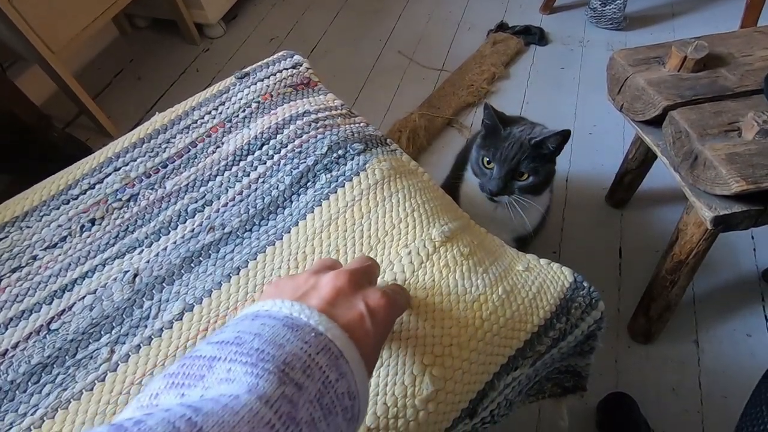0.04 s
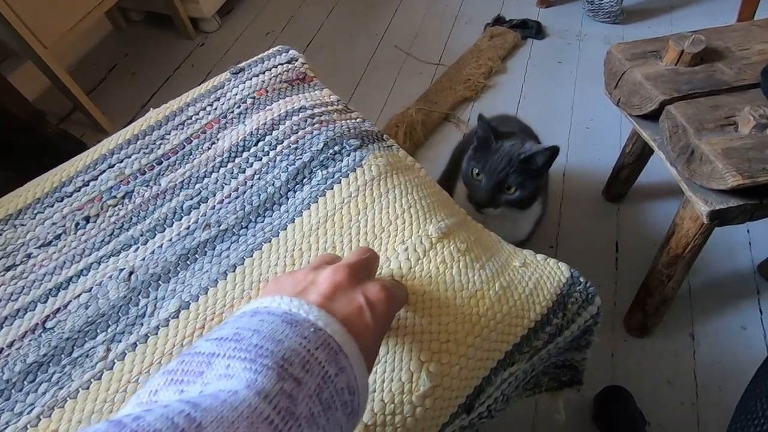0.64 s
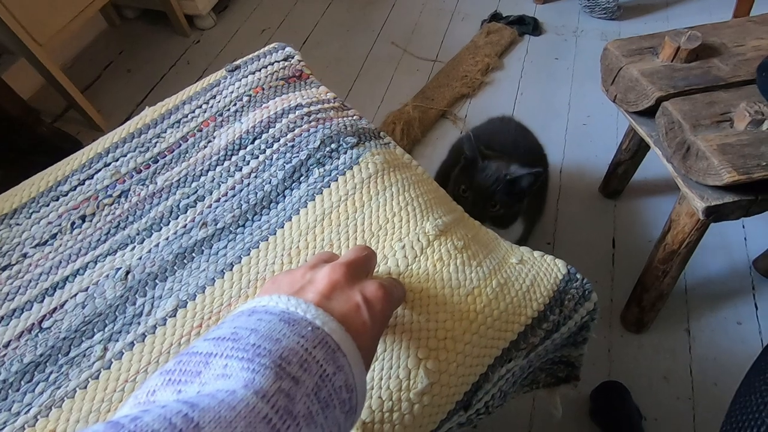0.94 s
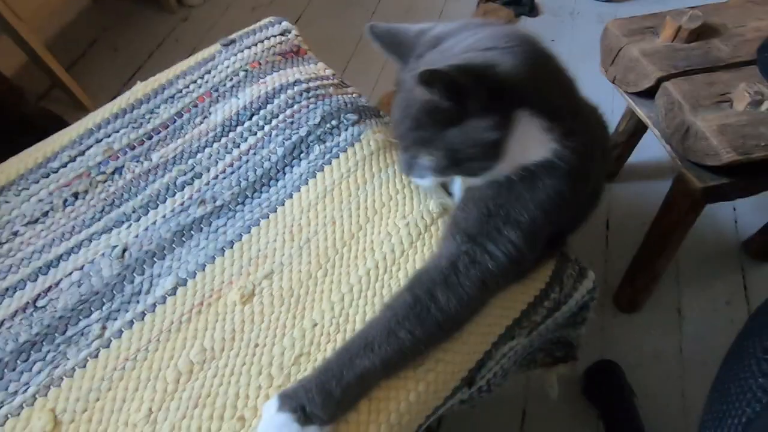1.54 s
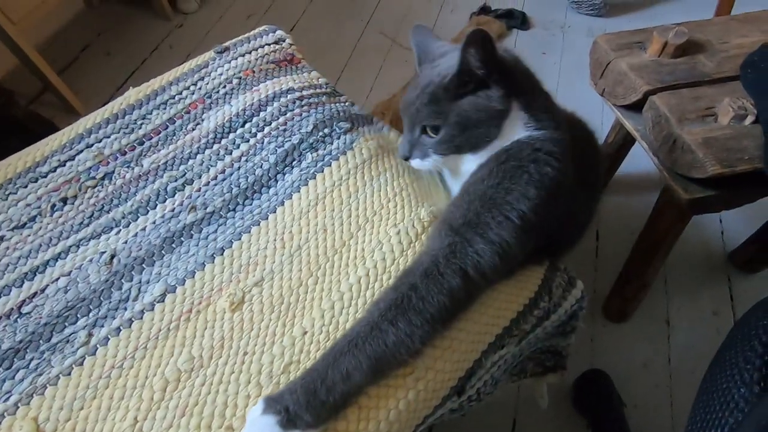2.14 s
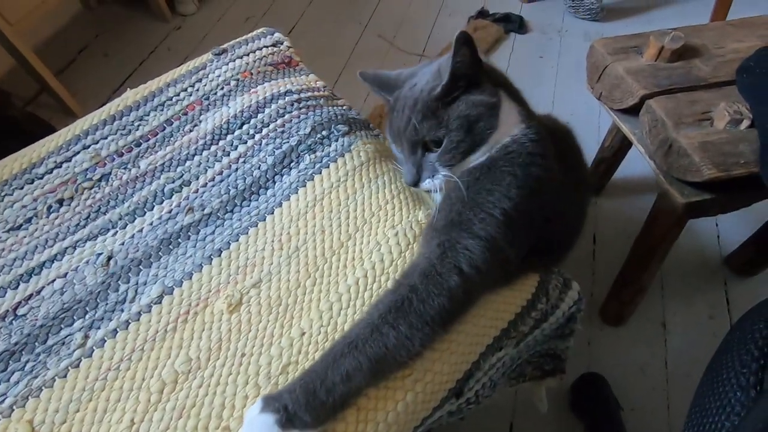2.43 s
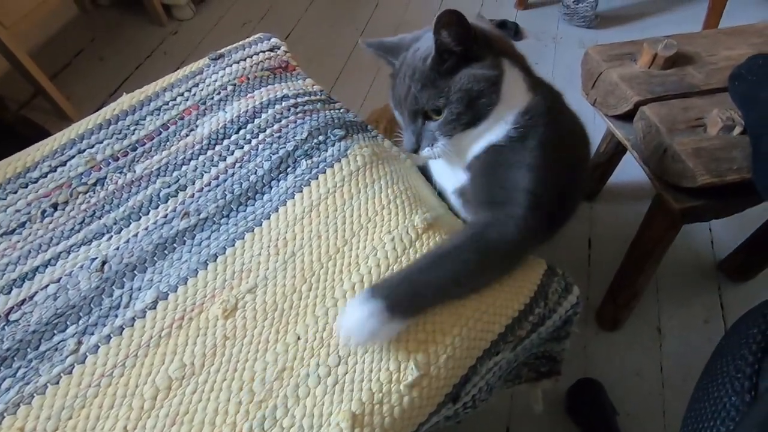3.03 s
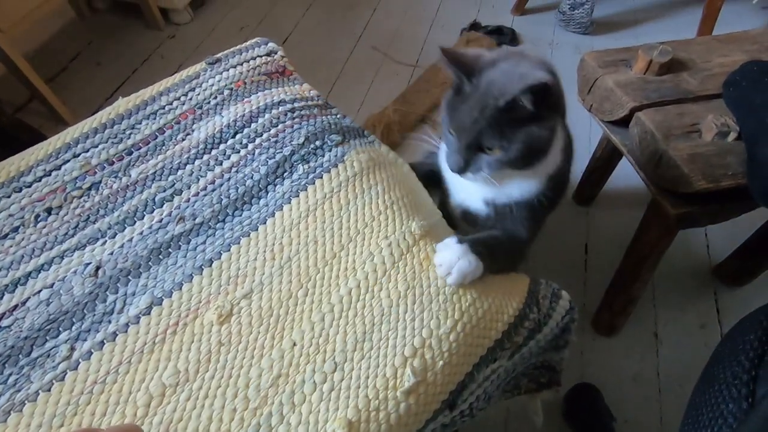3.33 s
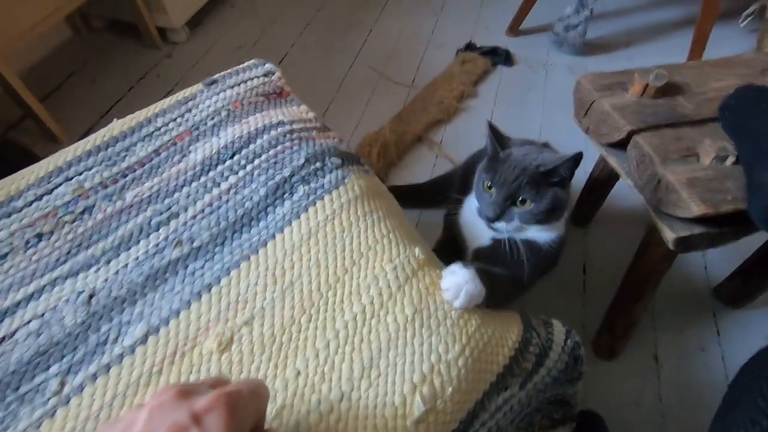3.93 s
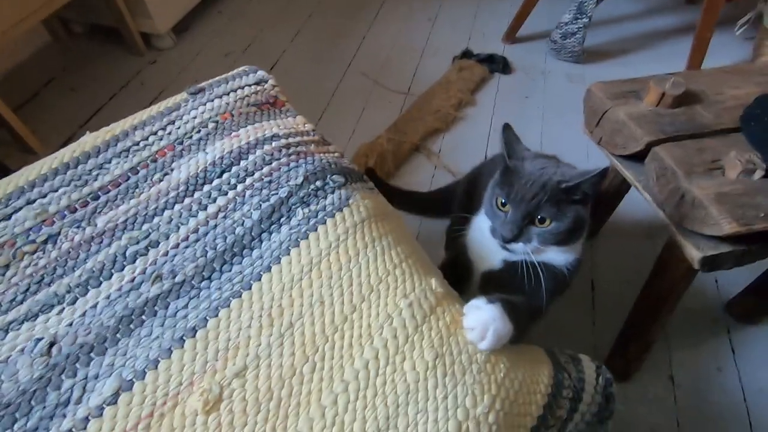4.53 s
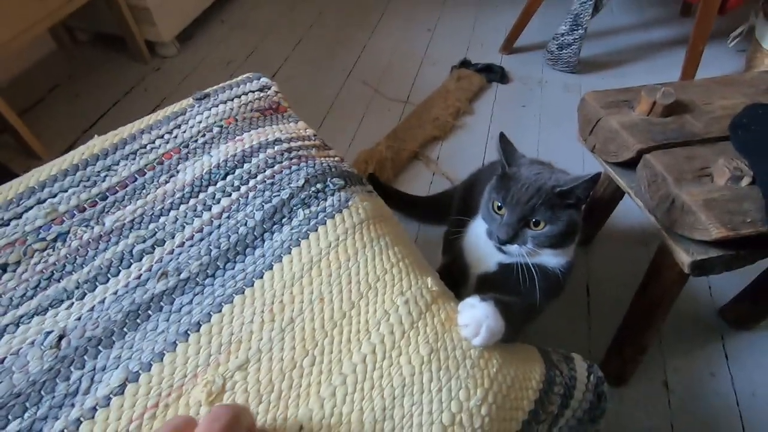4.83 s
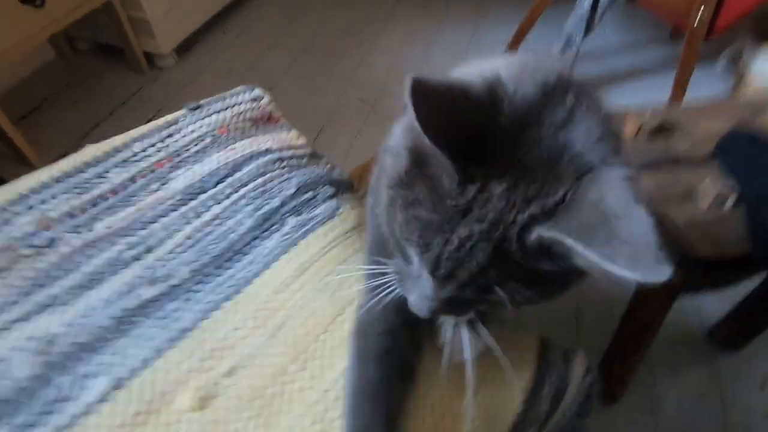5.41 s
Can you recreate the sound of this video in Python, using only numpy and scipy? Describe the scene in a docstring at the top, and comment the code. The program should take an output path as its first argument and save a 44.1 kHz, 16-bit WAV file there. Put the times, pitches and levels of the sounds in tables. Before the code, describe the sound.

A cat's paws thud and scratch on a rug-covered wooden table, with cloth rustling and low microphone bumps in a quiet room.

```python
"""A cat's paws and a teasing hand thud on a woven rug laid over a wooden table, ringing the padded wood.
Claws rake the weave and pluck its threads, the rug drags on the wood, and fur and a sleeve rustle.
Heard from close by on the stereo microphones of a hand-held camera, which is bumped, rubbed and
rumbles as the hand darts in and out. Behind it all lies a quiet furnished room with a faint hiss."""
import sys
import numpy as np
from scipy import signal
from scipy.fft import rfft, irfft
from scipy.io import wavfile
from scipy.ndimage import uniform_filter1d

SR = 44100
rng = np.random.default_rng(int(sys.argv[2]) if len(sys.argv) > 2 else 0)


def bounce(signal):
    """Save signal as a 16-bit WAV file at the path given by the first command-line argument."""
    frames = np.transpose(np.atleast_2d(signal))
    limited = np.clip(frames, -1, 1)
    pcm = np.round(limited * 32767).astype(np.int16)
    wavfile.write(sys.argv[1], SR, pcm)


N = 249826

# landings on the rug, close to the camera: t/s, level/dB, hardness/(dB per octave), ring length factor
LANDINGS = [(0.28, -67.5, 5, 0.25), (1.083, -53, 3.5, 1.55), (1.2155, -31.5, 0, 0.36),
            (1.227, -38.5, 6, 0.93), (1.276, -39, -4.5, 0.69), (1.318, -38.5, -2, 2.26),
            (1.37, -34, -1.5, 0.51), (1.503, -45, 1, 0.43), (1.649, -55.5, -7, 0.97), (2.512, -49, -3, 2.4),
            (2.597, -41, -5.5, 0.56), (2.745, -43, 2.5, 0.59), (2.794, -46.5, 1.5, 0.33),
            (3.01, -62, 8, 0.76), (3.444, -37.5, 3, 0.66), (3.459, -37, 1.5, 0.57), (3.469, -36, 3.5, 0.51),
            (5.244, -47.5, 1.5, 1.74), (5.354, -50.5, 8, 0.32)]
# main modes of the table under the rug: f/Hz, relative level/dB, t60/s
TABLE_MODES = [(108, -7.5, 0.088), (158.2, 8.5, 0.22), (207.7, 7.5, 0.24), (312, -3, 0.21),
               (543, -14.5, 0.18), (613, -16.5, 0.25), (738, -11, 0.28), (848, -7, 0.094),
               (1177, -13.5, 0.23), (1525, -27, 0.24), (1715, -32, 0.33)]
# spectrum of its dense remaining modes: f/Hz, relative level/dB
WOOD_SPECTRUM = [(60, -25), (130, 1), (300, -5), (470, -15.5), (750, -18.5), (1600, -33.5), (2500, -48.5),
                 (6000, -66), (16000, -100)]
def paw_thuds():
    """Each paw or finger rings the table through the rug; harder blows reach its higher modes."""
    out, t = np.zeros((2, N)), np.arange(SR // 3) / SR
    for s, db, hardness, ring in LANDINGS:
        modes = 0
        for k, (hz, level, t60) in enumerate(TABLE_MODES):
            lag_s = rng.uniform(-0.00019, 0.00065, (2, 1))  # each microphone hears it at its own time
            decay = amp(level + hardness * np.log2(hz / 200) - 60 * t / (t60 * ring))
            modes += (-1) ** k * decay * np.sin(2 * np.pi * hz * (t + lag_s))
        tilted = [(hz, level + hardness * np.log2(hz / 200)) for hz, level in WOOD_SPECTRUM]
        dense = colour(mic_noise(len(t), alike=0.96), tilted) * amp(-60 * t / (0.26 * ring))
        blow = (unit(modes) + amp(-2.5) * unit(dense)) * (1 - np.exp(-t / 0.00037))
        add(out, s, amp(db) * unit_onset(blow, samples=880))
    return out


# thread snaps and nail taps on the rug: t/s, level/dB, low edge/Hz, high edge/Hz, left minus right/dB
SNAPS = [(1.0584, -54, 151, 2450, 5.5), (1.2898, -52.5, 7000, 10600, 2), (1.295, -51.5, 7000, 11000, 7),
         (1.305, -50, 3330, 10900, -12), (1.504, -48, 202, 3000, -4), (1.845, -59, 188, 1240, 4.5),
         (2.5018, -47, 1198, 2430, -10), (2.515, -45.5, 1360, 3140, -2), (2.5342, -46, 1410, 3800, -7),
         (2.5916, -38, 380, 8000, 1), (2.597, -37, 400, 6000, 0), (2.7516, -55, 3180, 4660, -2),
         (2.766, -56.5, 900, 9800, 3), (2.7944, -47, 480, 6070, 3.5), (3.0128, -51, 590, 2200, 1.5),
         (3.3386, -50.5, 328, 5500, -1.5), (3.4433, -49, 380, 7100, -1), (3.4677, -53, 700, 6050, -1),
         (3.991, -54, 4000, 9940, -11), (5.349, -59, 8050, 11000, -3.5), (5.3561, -44.5, 700, 2350, 1)]
def claw_snaps():
    """A thread slips off a claw: one snap and a brief spray of fibre noise."""
    out, t = np.zeros((2, N)), np.arange(SR // 50) / SR
    for s, db, low_hz, high_hz, pan_db in SNAPS:
        snap = 0.16 * mic_noise(len(t), alike=0.3) * np.exp(-t / 0.0012)
        snap[[0, 1], [0, 2]] += 1  # the click reaches the left microphone a moment earlier
        snap = unit_onset(band(snap, low_hz, high_hz, order=4), samples=350)
        add(out, s, amp(db) * pan(pan_db) * snap)
    return out


# the weave under the claws, a little to the right: f/Hz, relative level/dB
WEAVE_SPECTRUM = [(200, -1.5), (500, -7), (950, -11), (1450, 2.5), (2100, 1), (2800, -7.5), (3300, -2.5),
                  (4600, -8.5), (7000, -28.5), (9700, -25), (15000, -47)]
def claw_rake(start_s=2.499, hold_s=0.076, bite_s=0.0049, t60_s=0.31, build_db_per_s=19, skips_per_s=240):
    """Claws bite, tear across the weave, skipping from thread to thread, and let go."""
    t = np.maximum(np.arange(N) / SR - start_s, 0)
    bite = 1 - np.exp(-t / bite_s)
    pull = bite * amp(build_db_per_s * t - 60 * np.maximum(t - hold_s, 0) / t60_s)
    skips = np.cumsum(rng.exponential(SR / skips_per_s, N // 40))
    catches = np.bincount(skips[skips < N].astype(int), minlength=N)
    grit = 1 + 1.6 * signal.lfilter([1], [1, -np.exp(-1 / (0.0008 * SR))], catches)
    return amp(-47.5) * colour(mic_noise(N, alike=0.75) * grit, WEAVE_SPECTRUM) * pull * pan(-3)


# short brushes over the weave, close up: t/s, level/dB, t60/s, low edge/Hz, high edge/Hz
BRUSHES = [(1.215, -34, 0.16, 1090, 1590), (1.365, -47.5, 0.098, 1500, 3520),
           (1.678, -63, 0.2, 3530, 11800), (1.769, -54, 0.13, 920, 2800), (1.894, -57, 0.22, 1000, 2900),
           (2.349, -70.5, 0.41, 2980, 8800), (2.756, -60, 0.16, 944, 5450), (3.455, -62, 0.57, 1000, 5100),
           (5.241, -48.5, 0.13, 835, 3980), (5.466, -47, 0.21, 400, 3130)]
def paw_scuffs(rise_cycles=4.1):
    """A paw or finger brushes the rug and comes to rest."""
    out, t = np.zeros((2, N)), np.arange(SR // 2) / SR
    for s, db, t60, low_hz, high_hz in BRUSHES:
        rise_s = rise_cycles / low_hz  # duller strokes start more softly
        stroke = np.minimum(t / rise_s, 1) * amp(-60 * np.maximum(t - rise_s, 0) / t60)
        friction = band(fibres(len(t), grain_db=2.5, alike=0.39), low_hz, high_hz)
        add(out, s, amp(db) * stroke * unit(friction))
    return out


# the rug shifting on the tabletop, centred: t/s, hold/s, level/dB, resonance f/Hz
DRAGS = [(1.634, 0.016, -56, 284), (1.734, 0.067, -59, 281), (1.91, 0.098, -58.5, 282),
         (1.967, 0.0059, -63.5, 613), (2.254, 0.14, -64, 206), (2.324, 0.016, -50, 202),
         (2.705, 0.026, -59.5, 225), (2.751, 0.013, -46, 202.3), (3.016, 0.021, -53.5, 172),
         (3.228, 0.023, -60, 232)]
def rug_drags(relative_width=0.3):
    """The leaning cat drags the rug over the wood, which answers with a hollow, narrow-band murmur."""
    out = np.zeros((2, N))
    for s, hold_s, db, hz in DRAGS:
        edges_hz = [hz * (1 - relative_width / 2), hz * (1 + relative_width / 2)]
        wood = signal.butter(2, edges_hz, "band", fs=SR, output="sos")
        murmur = unit(signal.sosfilt(wood, mic_noise(N, alike=0.98)))
        out += amp(db) * swell(s, hold_s, rise_s=0.08, t60_s=0.12) * murmur
    return out


# movements near the camera: full speed t/s, hold/s, rise/s, t60/s, relative body/dB, relative sheen/dB
MOVEMENTS = [(1.333, 0.053, 0.33, 0.28, -41, -59), (1.45, 0.055, 0.77, 0.26, -54, -66.5),
             (1.63, 0.022, .3, 4.4, -65.5, -86), (2.908, 0.61, .4, 1.2, -71, -84.5),
             (3.728, 0.6, 0.57, 0.93, -64.5, -77), (5.24, 0.05, 0.14, 0.18, -54, -64.5),
             (5.429, 0.082, 0.49, 0.22, -50.5, -64.5), (5.574, 0.088, 0.33, 0.45, -61.5, -74)]
# soft body of the rustle: f/Hz, relative level/dB
BODY_SPECTRUM = [(150, -2.5), (400, 9), (900, 3.5), (1800, 3.5), (3000, -1), (5000, -9), (7000, -14),
                 (14000, -29.5)]
# fine hiss of its fibres: f/Hz, relative level/dB
SHEEN_SPECTRUM = [(2500, -4), (5200, 10.5), (7000, 1), (9500, 3), (12000, -13), (15500, -38)]
def cloth_rustle():
    """Fur, sleeve and rug slide: a soft body and a fine hiss, wavering with the pressure."""
    moves = [(swell(*shape), body_db, sheen_db) for *shape, body_db, sheen_db in MOVEMENTS]
    body_gain = np.max([amp(db) * move for move, db, _ in moves], axis=0)
    sheen_gain = np.max([amp(db) * move for move, _, db in moves], axis=0)
    body = colour(fibres(N, grain_db=-1.0, alike=0.016), BODY_SPECTRUM) * body_gain
    sheen = colour(fibres(N, grain_db=2.0, alike=0.088), SHEEN_SPECTRUM) * sheen_gain
    pressure = waver(N, depth_db=2.15, samples=1300)
    return (amp(-5.0) * body + amp(0.5) * sheen) * pressure * pan(0.1)


# bumps on the camera body: t/s, thump level/dB, thump f/Hz, sway level/dB, left minus right/dB
BUMPS = [(1.309, -19.5, 84, -29, -12.5), (1.365, -34, 98, -21.5, -4), (1.376, -17, 112.4, -36, -15.5),
         (1.436, -19, 139, -29.5, 8), (3.989, -30.5, 128, -25.5, -9), (4.174, -9, 191.8, -21, -4.5),
         (4.205, -44.5, 140, -22.5, 3), (5.433, -33.5, 108, -27, -12)]
# modes of its case: f/Hz, relative level/dB, t60/s, phase between the microphones/rad
CASE_MODES = [(296.5, -14.5, 0.044, 0.86), (645, -15, 0.011, 1.3), (1223, -21, 0.015, 4.55),
              (4190, -38.5, 0.011, .2)]
# its loose parts: f/Hz, relative level/dB
CLATTER_SPECTRUM = [(150, -8), (450, 6), (1400, -6), (1900, -31), (5000, -26.5), (15000, -59)]
def camera_jolts(full_ring_db=-9, ring_db_per_db=2.27, clatter_t60_s=0.054):
    """Each jolt thumps the camera and sways it in the hand; only a hard one rings its case."""
    out, t = np.zeros((2, N)), np.arange(-SR // 8, SR // 4) / SR
    age = np.maximum(t, 0)
    modes = sum(amp(db - 60 * age / t60) * mic_sine(hz * age, spread_rad)
                for hz, db, t60, spread_rad in CASE_MODES)
    rattle = colour(mic_noise(len(t), alike=0.61), CLATTER_SPECTRUM)
    clatter = amp(-33 - 60 * age / clatter_t60_s) * rattle
    ring = (modes + clatter) * (1 - np.exp(-age / 0.0017))
    for s, db, hz, sway_db, pan_db in BUMPS:
        thump = amp(db) * swing(t, hz, cycles=0.51, spread_rad=0.29)
        sway = amp(sway_db) * swing(t, hz=37.6, cycles=0.57, spread_rad=0.69)
        ring_gain = amp(ring_db_per_db * (db - full_ring_db))
        add(out, s + t[0], pan(pan_db) * (thump + sway + ring_gain * ring))
    return out


# finger strokes on the camera case: t/s, hold/s, level/dB
FINGER_STROKES = [(1.305, 0.056, -44.5), (1.374, 0.0056, -33.5), (3.991, 0.00081, -53),
                  (4.172, 0.0046, -46.5)]
def finger_rubs():
    """A finger drags over the camera case beside the right microphone."""
    press = sum(amp(db) * swell(s, hold_s, rise_s=0.04, t60_s=0.049) for s, hold_s, db in FINGER_STROKES)
    skin = band(fibres(N, grain_db=3.0, alike=0.19), low_hz=248, high_hz=1047, order=3)
    return unit(skin) * press * pan(-8)


# shifts of the hand holding the camera: t/s, level/dB, t60/s
GRIP_SHIFTS = [(0.717, -43.5, 0.21), (1.351, -20.5, 0.62), (1.87, -43, 0.31), (2.38, -51, 1),
               (4.05, -34.5, 0.73), (4.251, -34.5, 1), (5.479, -28.5, 0.55)]
# rumble carried through the body to the microphones: f/Hz, relative level/dB
RUMBLE_SPECTRUM = [(12, -1.5), (25, 6), (50, -1.5), (80, -23.5), (130, -23), (250, -34), (1500, -101.5)]
def grip_rumble(tremor_db=-62.5):
    """The camera rumbles in the grip: a steady tremor, and a swell with each shift."""
    motion = amp(tremor_db) * np.ones(N)
    for s, db, t60 in GRIP_SHIFTS:
        motion = np.hypot(motion, amp(db) * swell(s, hold_s=0, rise_s=0.63 * t60, t60_s=t60))
    roughness = (motion / motion.max()) ** 0.81  # only rough handling shakes the case
    thudding = amp(-10.0) * roughness * unit(band(mic_noise(N, alike=0.5), low_hz=52, high_hz=170))
    return (colour(mic_noise(N, alike=0.49), RUMBLE_SPECTRUM) + thudding) * motion


# decay of the room around the table: f/Hz, t60/s
ROOM_DECAY = [(100, 0.72), (500, 0.23), (3000, 0.25), (8000, 0.15), (15000, 0.22)]
def room_echo(x):
    """A short furnished-room tail, dying sooner in the treble."""
    hz, t, spectrum = signal.stft(rng.standard_normal((2, SR // 2)), SR, nperseg=256)
    decay = amp(-60 * t / curve(ROOM_DECAY, hz)[:, None])
    _, tail = signal.istft(spectrum * decay, SR, nperseg=256)
    tail *= 1 - np.exp(-np.arange(tail.shape[1]) / SR / 0.0031)
    return signal.fftconvolve(x, tail / np.linalg.norm(tail[0]), axes=1)[:, :N]


# room tone at the camera: f/Hz, relative level/dB
TONE_SPECTRUM = [(60, -22.5), (110, -15), (180, -2), (330, -16.5), (480, -23.5), (800, -11.5), (877, -2),
                 (960, -12), (1350, -13.5), (2000, -22), (2400, -29.5), (6000, -36), (15000, -52)]
# its stereo width: f/Hz, side minus mid/dB
TONE_WIDTH = [(100, -11.5), (400, 6.5), (1300, 3.5), (4000, -1.5)]
# its level, easing and returning: t/s, level/dB
TONE_LEVEL = [(1.1, -65.5), (2.1, -69), (4.502, -67), (5.0, -66), (5.6, -61.5)]
def room_tone():
    """Faint hiss of the house, arriving from all around."""
    mid, side = colour(rng.standard_normal((2, N)), TONE_SPECTRUM)
    side = equalise(side, TONE_WIDTH)
    level_db = np.interp(np.arange(N) / SR, *np.transpose(TONE_LEVEL))
    return amp(level_db) * unit(np.array([mid + side, mid - side])) * pan(1.0)


def amp(db):
    return 10 ** (np.asarray(db) / 20)


def unit(x):
    return x / np.sqrt(np.mean(x ** 2) + 1e-20)


def unit_onset(x, samples):
    """Scales a hit to rms 1 over its first samples."""
    return x / np.sqrt(np.mean(x[:, :samples] ** 2))


def pan(left_minus_right_db):
    return amp([[left_minus_right_db / 2], [-left_minus_right_db / 2]])


def add(mix, s, sound):
    part = mix[:, max(round(s * SR), 0):][:, :sound.shape[-1]]
    part += sound[..., :part.shape[1]]


def curve(points, hz):
    """A table joined by straight lines over log frequency."""
    f, value = np.transpose(points)
    return np.interp(np.log(hz + 1), np.log(f + 1), value)


def equalise(x, points):
    hz = np.fft.rfftfreq(x.shape[-1], 1 / SR)
    return irfft(rfft(x) * amp(curve(points, hz)), x.shape[-1])


def colour(x, points):
    return unit(equalise(x, points))


def band(x, low_hz, high_hz, order=6):
    """Causal band: soft below, steep above, falling gently in between."""
    low_hz, high_hz = np.clip([low_hz, high_hz], 20, SR / 2.2)
    x = signal.sosfilt(signal.butter(2, low_hz, "high", fs=SR, output="sos"), x)
    x = 0.08 * x + signal.sosfilt(signal.butter(1, low_hz, fs=SR, output="sos"), x)
    return signal.sosfilt(signal.butter(order, high_hz, fs=SR, output="sos"), x)


def mic_noise(size, alike):
    """White noise, partly alike at the two microphones."""
    common = rng.standard_normal(size)
    return np.sqrt(alike) * common + np.sqrt(1 - alike) * rng.standard_normal((2, size))


def mic_sine(turns, spread_rad):
    """A vibration, out of step at the two microphones."""
    return np.sin(2 * np.pi * turns + spread_rad * np.array([[0.5], [-0.5]]))


def waver(size, depth_db, samples):
    """A random gain, smoothed over some samples."""
    return amp(depth_db * unit(uniform_filter1d(rng.standard_normal(size), samples)))


def fibres(size, grain_db, alike):
    """Friction noise: threads catch and let go in clumps of about a millisecond."""
    return mic_noise(size, alike) * waver(size, grain_db, samples=60)


def swell(s, hold_s, rise_s, t60_s):
    """Gain of one movement: builds by 60 dB over the rise, holds from s, then dies away."""
    t = np.arange(N) / SR - s
    return amp(-60 * (np.maximum(-t, 0) / rise_s + np.maximum(t - hold_s, 0) / t60_s))


def swing(t, hz, cycles, spread_rad, lag_cycles=0.79):
    """One way, back, and dying out; strongest about lag_cycles after the jolt."""
    turns = hz * t - lag_cycles
    age = np.clip(turns / cycles, -20, 20)
    return 2 * mic_sine(turns, spread_rad) / (np.exp(-3 * age) + np.exp(2 * age))


def scene():
    """The play on the table echoes in the room; handling noise reaches the microphones directly."""
    thuds, snaps = paw_thuds(), claw_snaps()
    friction = paw_scuffs() + rug_drags() + claw_rake() + cloth_rustle()
    echo = room_echo(amp(-22.5) * thuds + amp(-7.5) * snaps + amp(-12.5) * friction)
    handling = grip_rumble() + finger_rubs() + camera_jolts()
    return thuds + snaps + friction + echo + handling + room_tone()


def record(dry):
    """The camera cuts the treble above 15.6 kHz."""
    lowpass = signal.firwin(255, 15600, window=("kaiser", 9), fs=SR)
    return signal.oaconvolve(dry, lowpass[None], "same")


dry = scene()
out = record(dry)
bounce(out)
```